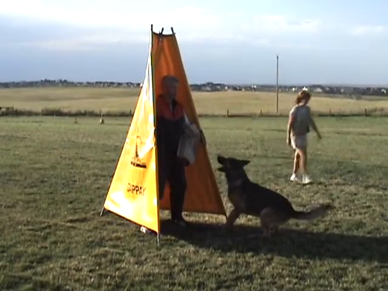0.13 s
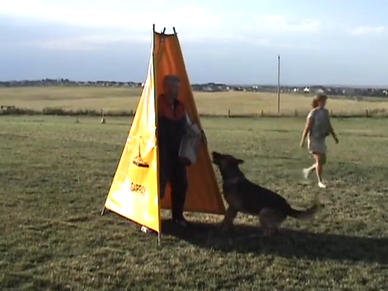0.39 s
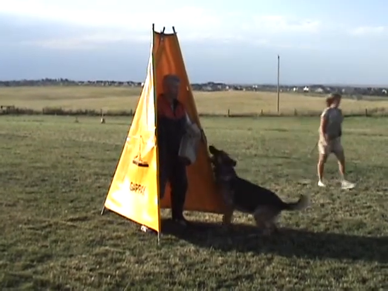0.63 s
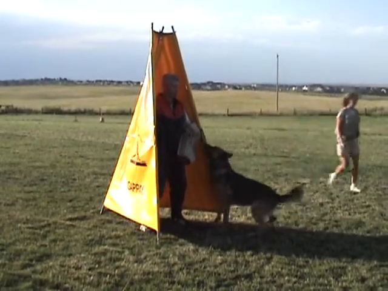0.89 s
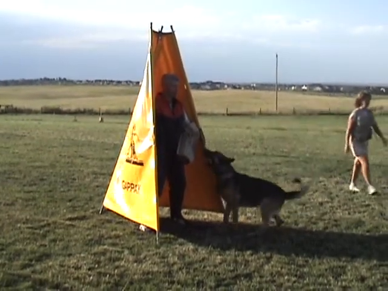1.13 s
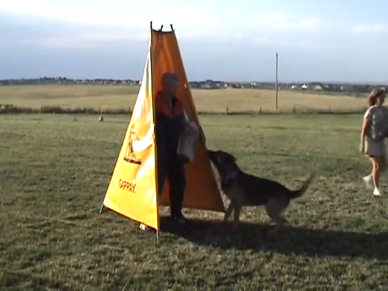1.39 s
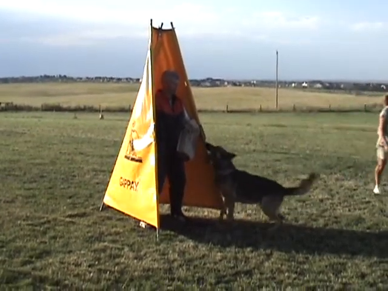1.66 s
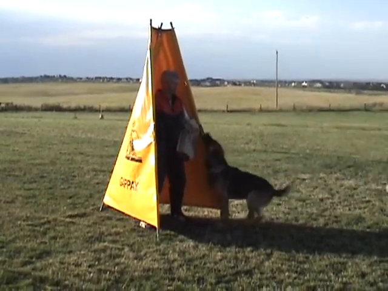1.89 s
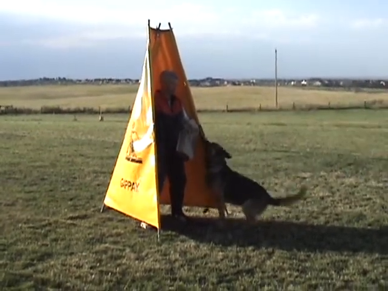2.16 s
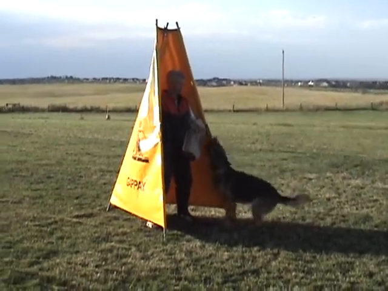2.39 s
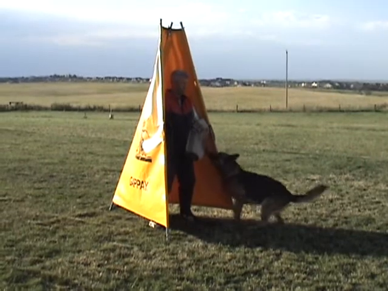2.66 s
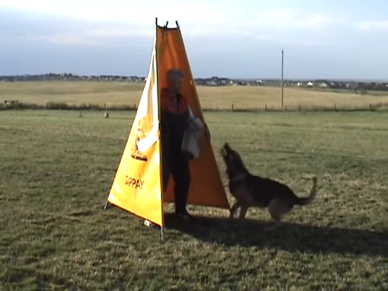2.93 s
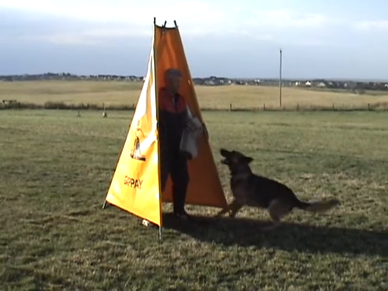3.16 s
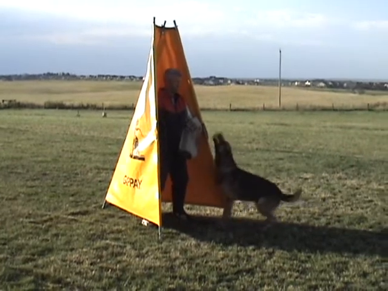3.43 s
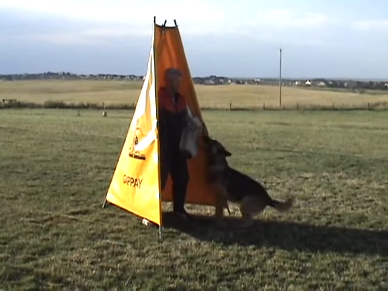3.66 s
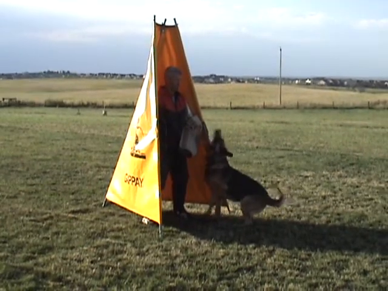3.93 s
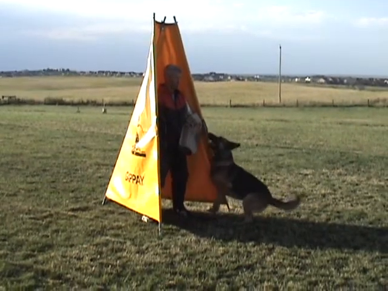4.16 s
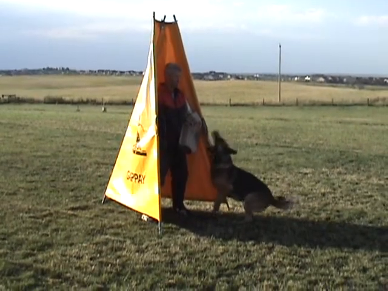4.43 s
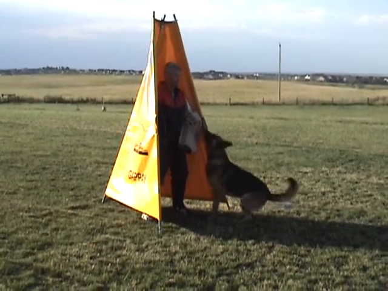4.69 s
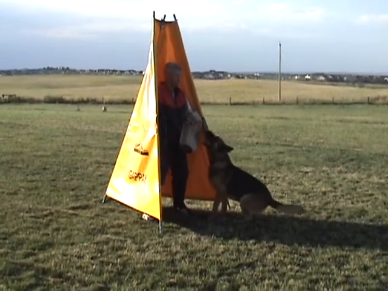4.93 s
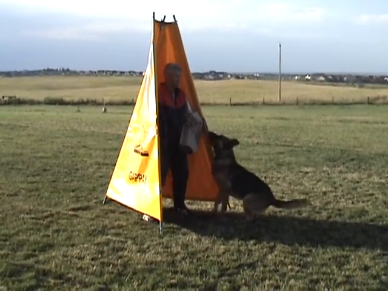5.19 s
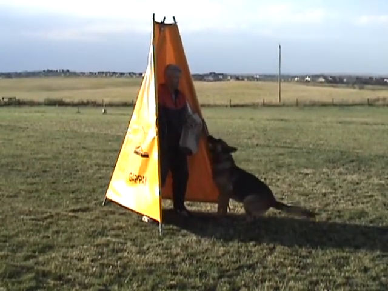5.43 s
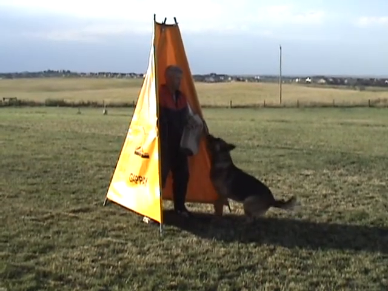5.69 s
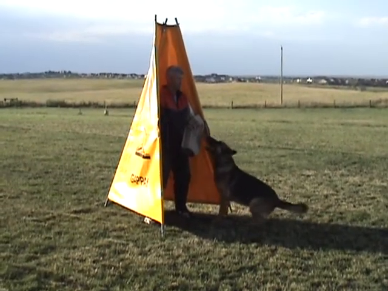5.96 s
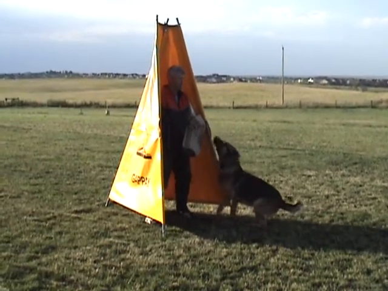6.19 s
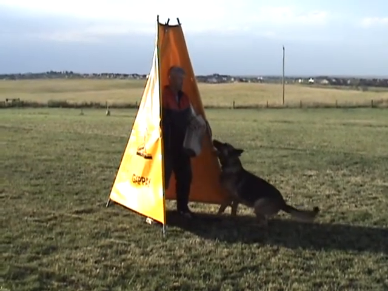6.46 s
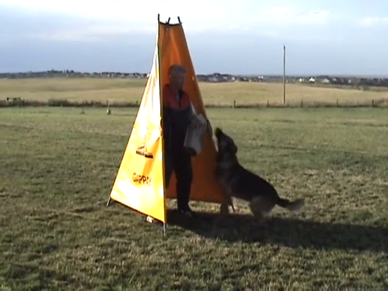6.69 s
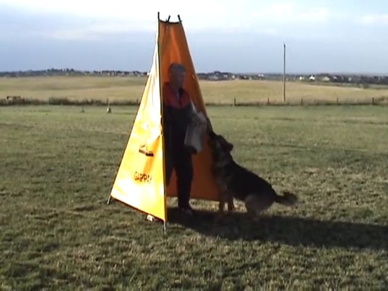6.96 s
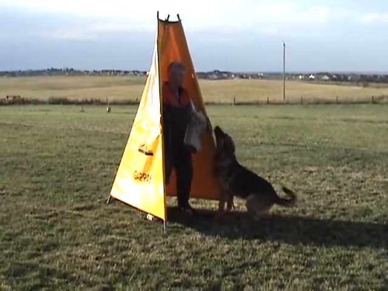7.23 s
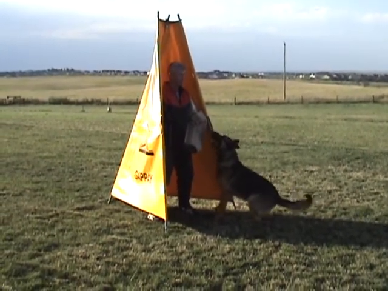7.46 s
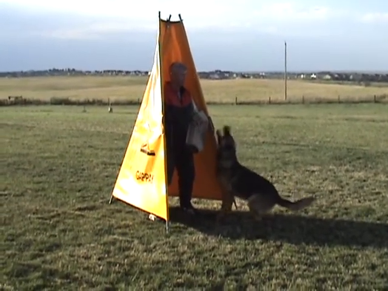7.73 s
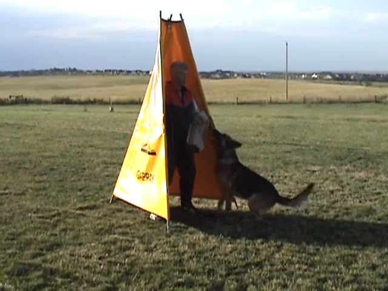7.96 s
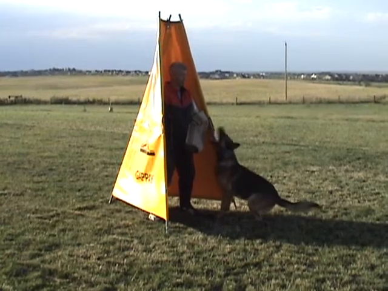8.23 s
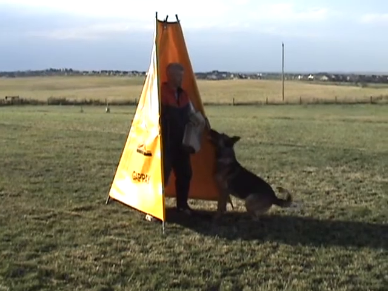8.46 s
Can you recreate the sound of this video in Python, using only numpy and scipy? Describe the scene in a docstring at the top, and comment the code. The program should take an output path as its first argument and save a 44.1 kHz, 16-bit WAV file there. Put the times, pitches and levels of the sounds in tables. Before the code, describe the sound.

Close, rough barking at an even pace with jaw snaps and breathy gasps, light wind rumble, and a second dog yelping near the end.

```python
"""Hoarse dog barking on a grass field

A large dog close to the microphone barks about twice a second, snapping its jaws and gasping after most barks.
Its voice is rough pulses and puffs of breath through throat resonances; snaps and gasps are shaped noise.
Farther off a second dog, the same kind of voice in a rounder throat, whines faintly, then yelps and
grumbles louder. Lumpy low wind noise and a steady wash of the field lie under both dogs and their echoes."""
import sys
import numpy as np
from scipy import signal
from scipy.fft import rfft, irfft
from scipy.io import wavfile
from scipy.ndimage import uniform_filter1d

SR = 44100
rng = np.random.default_rng(int(sys.argv[2]) if len(sys.argv) > 2 else 0)


def store_wav(level_fs):
    """Save 16-bit WAV to argv[1]."""
    pcm = np.round(np.clip(np.atleast_2d(level_fs), -1, 1) * 32767)
    wavfile.write(sys.argv[1], SR, pcm.T.astype(np.int16))


def volts(x):
    """Linear amplitude factor 10**(x/20) for a level x in dB, scalar or array-like."""
    e = np.asarray(x, float) / 20
    return 10 ** e


N = 379260  # length in samples, 8.6 s

# throat resonances of the second dog at mouth factor 1: f/Hz, width/Hz, relative level/dB
OTHER_THROAT = [(430, 247, 3.5), (765, 49, 4.5), (1100, 130, -8), (1620, 370, -42), (2680, 250, -37.5),
                (4520, 600, -30.5)]


def evened(x):
    """Scales to rms 1."""
    return x / np.sqrt(np.mean(x ** 2) + 1e-20)


def read(points, hz):
    """Reads a table of values over frequency on a log-frequency axis."""
    f, value = np.transpose(points)
    return np.interp(np.log(hz + 1), np.log(f + 1), value)


def add(mix, s, sound):
    """Mixes a sound in at s seconds."""
    part = mix[round(s * SR):][:len(sound)]
    part += sound[:len(part)]


def wander(count, hz):
    """Smooth random drift of rms 1, with little movement faster than hz."""
    return evened(signal.lfilter(*signal.butter(2, hz, fs=SR), rng.standard_normal(count)))


def hiss(colour, same, patchy_db):
    """Stereo noise of one colour and rms 1; same is the likeness of the channels, -1 to 1."""
    frames, hz = N // 256 + 5, np.fft.rfftfreq(1024, 1 / SR)
    a, b, c, d, patches = rng.standard_normal((frames, 513, 5)).T
    # patches of time and frequency drift up and down in level
    patches = uniform_filter1d(patches, size=8, axis=0)
    patches = evened(uniform_filter1d(patches, size=10, axis=1))
    same = np.clip(same, -1, 1)
    left = a + 1j * b
    right = same * left + np.sqrt(1 - same ** 2) * (c + 1j * d)
    z = np.array([left, right]) * volts(read(colour, hz)[:, None] + patchy_db * patches)
    return evened(signal.istft(z, nperseg=1024, noverlap=768)[1][:, :N])


def wind():
    """Wind on the microphone ports: low noise buffeting in lumps under a slow gust curve."""
    # gust curve before the lumps: t/s, level/dB
    gusts = [(0, -87), (0.598, -43.5), (1.899, -47), (2.15, -59.5), (3.3, -59), (3.6, -49), (3.902, -46),
             (4.352, -47), (4.5, -64.5), (5.2, -58.5), (6.52, -64), (6.62, -35), (7.15, -41.5),
             (7.7, -32.5), (7.951, -56), (8.131, -26.5), (8.4, -45), (8.6, -31)]
    # spectrum of the buffeting: f/Hz, relative level/dB per Hz
    wind_colour = [(15, -14.5), (55, 3.5), (110, -4.5), (200, -9.5), (400, -37.5), (900, -62.5)]
    s, level_db = np.transpose(gusts)
    lumps_db = 4.5 * wander(N, 13)
    gust = volts(np.interp(np.arange(N) / SR, s, level_db) + lumps_db)
    return gust * hiss(wind_colour, -.72, patchy_db=1.5)  # the ports move largely in opposition


def field():
    """The far wash of the field: steady coloured noise, partly alike at both ports."""
    # spectrum of the wash: f/Hz, relative level/dB per Hz
    field_colour = [(150, -4), (350, -2), (800, -1.5), (1500, -8.5), (3000, -18), (6000, -22),
                    (9000, -26.5), (13000, -34), (15800, -40.5)]
    return volts(-53.5) * hiss(field_colour, 0.68, patchy_db=.8)


def resonate(x, hz, width):
    """A steep resonance: shifts the curve hz down to zero, smooths twice and shifts back."""
    turn = np.exp(2j * np.pi * np.cumsum(hz * np.ones(len(x))) / SR)
    r = np.exp(-np.pi * width / SR)
    smooth = signal.lfilter([(1 - r) ** 2], [1, -2 * r, r * r], x / turn)
    return 2 * (turn * smooth).real


def tract(x, modes, mouth=1):
    """Parallel resonances of alternating sign, all moved in frequency by the mouth factor."""
    return sum((-1) ** k * volts(db) * resonate(x, f * mouth, w) for k, (f, w, db) in enumerate(modes))


def voice(rows, throat, jitter, throb_hz, breath, chest_db, low_hz):
    """Uneven vocal pulses and cycle-gated puffs pass a throat; roughness unsettles pitch and strength."""
    s, *columns = np.transpose(rows)
    t = np.arange(s[0], s[-1], 1 / SR)
    effort_db, hz, rough, mouth, half = (np.interp(t, s, c) for c in columns)
    rough = np.clip(rough, 0, 1)
    turns = np.cumsum(hz * (1 + jitter * rough * wander(len(t), 60))) / SR
    # each partial swells and fades on its own as the folds lose step
    folds = 0
    for k in range(1, 9):
        partial = np.cos(2 * np.pi * k * turns + .5 * k ** 2)
        folds = folds + volts(8 * rough * wander(len(t), 35)) * partial
    # a slower flapping tissue beats against the folds and splits each line
    throb_turns = np.cumsum(throb_hz * (1 + 0.331 * wander(len(t), 38.9))) / SR
    throb = np.cos(2 * np.pi * throb_turns + 2 * np.pi * rng.random())
    folds *= (1 + half * np.cos(np.pi * turns)) * (1 + rough * throb)  # half: strong-weak pulse pairs
    # breath noise is strongest at the start of each cycle
    puff_shape = 1.5 + np.exp(-(turns % 1) / .5)
    puffs = puff_shape * rng.standard_normal(len(t)) * volts(1.1 * wander(len(t), 55))
    source = (1 - rough ** 2) * evened(folds) + (.5 + breath * rough ** 2) * evened(puffs)
    sound = tract(source, throat, mouth)
    sound = signal.sosfilt(signal.butter(4, low_hz, "high", fs=SR, output="sos"), sound)
    loudness = np.sqrt(uniform_filter1d(sound ** 2, size=800) + 1e-9)  # evened out, then set by effort
    # the chest hums on as the mouth shuts
    chest = volts(chest_db + effort_db / 2) * (1 + rough * throb) * np.sin(2 * np.pi * turns)
    return s[0], (volts(effort_db) * sound / loudness + chest) * signal.windows.tukey(len(t), .03)


def bark(start, break_s, shut_s, effort_db, late_hz):
    """Hoarse and doubled at the start, clear as the pitch settles, then breaking upward and sagging to a groan."""
    # near dog's throat at mouth factor 1: f/Hz, width/Hz, relative level/dB
    near_throat = [(697.7, 222, 1.5), (921, 579, -4), (1480, 258, -13), (1720, 151, -9), (2190, 820, -33.5),
                   (3030, 170, -37), (4240, 1270, -31), (6080, 1120, -37), (8400, 5300, -48.5),
                   (11500, 34000, -68.5)]
    # eight stages: onset, full voice, voice clears, clear end, break upward, sag, jaws shut, groan
    # columns before tiring: roughness [0-1], depth of the strong-weak pulse pattern, mouth [factor on throat]
    stage_shape = [(.55, .9, 1), (.42, 1, 1.05), (.2, .3, 1.01), (.1, .05, .98), (.33, 1, 1.03),
                   (.36, 1.2, .98), (.58, .8, .94), (.7, .3, 1.08)]
    # effort at the eight stages, against the bark's own: level/dB
    stage_db = [-22, -2.5, 0.5, 1.5, -2.5, -3.5, -13, -36.5]
    rise_s, clear_s, jump_s, close_s, groan_s = 0.02724, 0.02844, .014, 0.0288, .048
    broken = break_s + jump_s
    clears = max(break_s - clear_s, (rise_s + break_s) / 2)
    sags = max(shut_s - close_s, broken)
    s = start + np.array([0, rise_s, clears, break_s, broken, sags, shut_s, shut_s + groan_s])
    # the clear stretch starts just below its final pitch; pitch falls as the jaws close
    clear_hz = 344.9
    hz = [295.5, 324.64, .975 * clear_hz, clear_hz, 430, late_hz, .88 * late_hz, 204.5]
    rough, half, mouth = np.transpose(stage_shape)
    rough = rough * (1 + .04 * start)  # hoarser with each second
    mouth = mouth * (1.031 - 0.0059 * start)  # opens a little less wide as the dog tires
    stages = np.column_stack([s, effort_db + np.array(stage_db), hz, rough, mouth, half])
    # low_hz: the bark is thin below this
    return voice(stages, near_throat, jitter=.06, throb_hz=85, breath=3.2, chest_db=-31, low_hz=260)


def snap(s, db):
    """Jaws snapping shut: a crack of noise, fading in milliseconds, rings teeth and mouth."""
    # rings of teeth and mouth: f/Hz, width/Hz, relative level/dB
    teeth = [(3160, 800, 7.5), (6500, 4000, -9.5), (1200, 550, 6)]
    t = np.arange(900) / SR
    ring = tract(rng.standard_normal(len(t)) * np.exp(-t / 0.0042), teeth)
    return s, volts(db) * ring / abs(ring).max()


def gasp(s, flow_db, wheeze_db, rise=.045):
    """Turbulent air swells quickly through the open airway, wheezes in the windpipe and dies away."""
    # airway while drawing breath: f/Hz, width/Hz, relative level/dB
    airway = [(740, 1220, 7), (1290, 1470, 6.5), (2554, 460, -5.5), (3134, 700, -3.5), (5740, 3760, -8.5),
              (10800, 4000, -38.5)]
    # narrow rings of the windpipe before they glide: f/Hz, width/Hz, relative level/dB
    windpipe = [(198, 67, -11), (1114, 98, -5)]
    t = np.arange(-rise, min(.13, N / SR - s), 1 / SR)
    air = rng.standard_normal(len(t)) * volts(1.6 * wander(len(t), 60))
    breath = volts(10.0) * evened(tract(air, airway))
    # the wheeze is weaker before the peak and glides upward
    wheeze_gain = volts(wheeze_db - 3.5 - 2.7 * (t < -0.01) + 2 * wander(len(t), 40))
    glide = 1 + 0.4 * np.clip(t, -rise, 0.03)
    wheeze = wheeze_gain * evened(tract(air, windpipe, glide))
    swell_db = np.where(t < 0, -14 * (t / rise) ** 2, -6 * t / 0.047 - 9 * (t / 0.069) ** 4)
    return s - rise, volts(flow_db + swell_db) * (breath + wheeze) * signal.windows.tukey(len(t), .1)


def whine(start, length, effort_db, hz):
    """A level note that swells and fades, the narrow throat ring set just under its second partial."""
    edge_db, mouth = effort_db - 8, 1.86 * hz / OTHER_THROAT[1][0]
    rows = [(start, edge_db, hz, mouth),
            (start + length / 2, effort_db, hz, mouth),
            (start + length, edge_db, hz, mouth)]
    return yelp(rows, rough=.3)


def yelp(rows, rough):
    """The second dog: a rounder throat and a slow beat in the voice."""
    stages = [(s, db, hz, rough, mouth, 0) for s, db, hz, mouth in rows]
    return voice(stages, OTHER_THROAT, jitter=.04, throb_hz=57, breath=2.5, chest_db=-45, low_hz=200)


def ports(x, lead_rad):
    """A centred source reaches the microphone's port pair with a faint, phase-shifted difference signal."""
    # off-axis pickup of the dogs: f/Hz, side against mid level/dB
    side_colour = [(200, -24.5), (700, -27.5), (1300, -16.5), (10000, -12.5)]
    hz = np.fft.rfftfreq(N, 1 / SR)
    side = irfft(rfft(x) * volts(read(side_colour, hz)) * np.exp(1j * lead_rad), N)
    return np.array([x + side, x - side])


def echoes(x):
    """Sparse returns from tent, ground and far trees, each band dying at its own speed."""
    # decay of the returns: f/Hz, time to fall 60 dB/s
    echo_decay = [(300, 0.15), (1000, 0.43), (3000, 0.61), (8000, 0.057)]
    taps = np.zeros((2, SR))
    at = np.arange(300, SR - 20, 20) + rng.integers(0, 20, (2, (SR - 301) // 20))
    np.put_along_axis(taps, at, rng.choice([-1., 1.], at.shape), 1)
    taps[1] = .8 * taps[0] + .6 * taps[1]  # the two sides are largely alike
    hz, t, z = signal.stft(taps, SR, nperseg=256)
    fade = volts(-60 * t / read(echo_decay, hz)[:, None])
    tail = signal.istft(z * fade, SR, nperseg=256)[1]
    return signal.fftconvolve(x[None], tail / np.linalg.norm(tail[0]), axes=1)[:, :N]


def scene():
    """Both dogs with their echoes, over wind and field wash."""
    # barks: start t/s, time until the voice breaks/s, time until the jaws shut/s, effort level/dB,
    # pitch after the break f/Hz
    barks = [(0.25, 0.052, 0.15, -7.5, 393.4), (0.768, 0.057, 0.15, -8.5, 384),
             (1.293, 0.059, 0.16, -8, 324.4), (1.835, 0.069, 0.15, -8.5, 393),
             (2.365, 0.069, 0.17, -9, 374.5), (2.885, .06, 0.16, -8, 357), (3.398, 0.072, 0.15, -8.5, 380),
             (3.955, 0.075, 0.17, -8.5, 360.7), (4.498, 0.065, 0.14, -9, 389),
             (5.028, 0.071, 0.16, -9, 375.2), (5.563, .07, 0.16, -8.5, 377), (6.095, 0.068, 0.16, -9, 358),
             (6.633, 0.058, 0.15, -8.5, 363.4), (7.166, .068, .153, -9, 357),
             (7.711, 0.053, 0.15, -9, 337.3), (8.275, .066, 0.17, -11, 407)]
    # gasps for air: peak t/s, flow level before a fixed lift of the hiss/dB, wheeze level before a trim/dB
    gasps = [(0.485, -45.5, 14.5), (1.016, -47.5, 13), (1.549, -48, 11.5), (1.719, -65, -15),
             (2.063, -49, 11), (2.625, -48, 19), (3.116, -50.5, 4.5), (3.644, -47.5, 15.5),
             (4.196, -49.5, 0.5), (4.713, -51.5, 14), (5.259, -51.5, 10.5), (5.786, -51, 12),
             (6.327, -52.5, 10.5), (6.853, -51.5, -8.5), (7.395, -53.5, 6.5), (8.501, -51, 16.5)]
    # jaws snapping shut: t/s, peak level/dB
    snaps = [(0.3835, -25), (0.9053, -30), (1.9859, -27), (2.0108, -35), (3.043, -28), (3.5359, -30),
             (4.1205, -33), (4.6354, -28), (5.1826, -32), (6.2537, -32), (7.3193, -27), (7.8544, -35)]
    # far whines of the second dog: start t/s, length/s, effort level/dB, pitch f/Hz
    whines = [(1.093, .17, -45, 339), (3.727, 0.15, -49.5, 345.6), (5.367, .19, -46, 386)]
    # its yelps and grumbles, one table a call: t/s, effort level/dB, pitch f/Hz, mouth [factor on throat]
    yelps = [
        [(7.63, -51.5, 440, 1.6), (7.65, -26.5, 486.3, 1.1), (7.68, -23.5, 502.7, 1.3),
         (7.695, -20.5, 389.7, 1), (7.74, -24.5, 383.3, 1), (7.8, -32, 370, 0.93)],
        [(7.86, -41, 375, 1.1), (7.9, -17.5, 392, 1.2), (7.925, -23, 430, 1.1), (7.965, -26, 413.4, 0.81),
         (8.01, -40.5, 354, 0.83), (8.045, -43.5, 352, .9)],
        [(8.045, -40, 361.4, .9), (8.08, -26.5, 342, 0.8), (8.11, -35.5, 305.8, 1.1), (8.16, -34, 320.6, 1.4),
         (8.19, -35, 295.5, 1.1), (8.225, -35, 284.7, 1.3), (8.32, -35, 308.5, 0.94)],
    ]
    near, other = np.zeros((2, N))
    for row in barks:
        add(near, *bark(*row))
    for row in gasps:
        add(near, *gasp(*row))
    for row in snaps:
        add(near, *snap(*row))
    for row in whines:
        add(other, *whine(*row))
    for rows in yelps:
        add(other, *yelp(rows, rough=.33))
    # the farther dog sends far more of its sound into the echoes
    echoed = echoes(volts(-23.5) * near + volts(-3.0) * other)
    dogs = ports(near, 2.04) + ports(other, 1.2) + echoed
    return dogs + wind() + field()


def band_limit(x):
    """A steep low-pass at the top of the band."""
    return signal.sosfilt(signal.butter(12, 15800, fs=SR, output="sos"), x)


def record(dry):
    """The camera adds its faint line whistle and rounds off peaks near full scale."""
    whistle = volts(-92) * np.sin(2 * np.pi * 15734 * np.arange(N) / SR)  # 15734 Hz
    x = dry + whistle
    rounded = x / (1 + x ** 6) ** (1 / 6)
    return band_limit(rounded)


dry = scene()
out = record(dry)
store_wav(out)
```